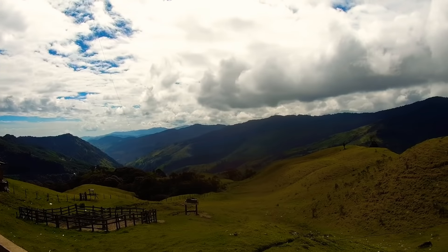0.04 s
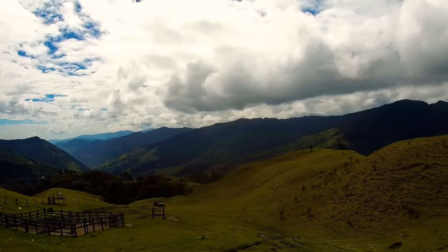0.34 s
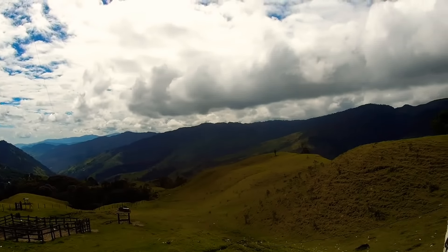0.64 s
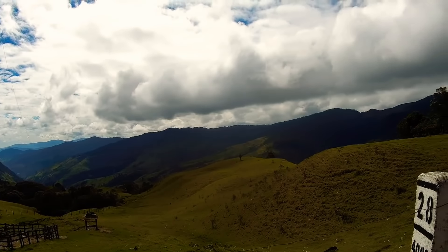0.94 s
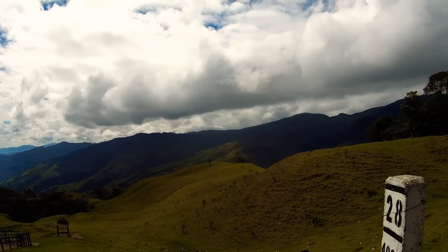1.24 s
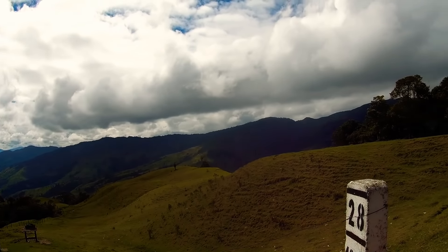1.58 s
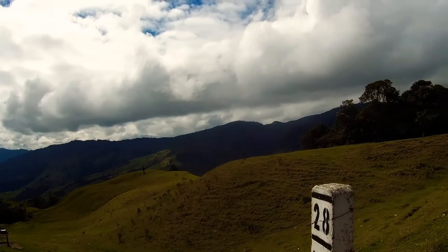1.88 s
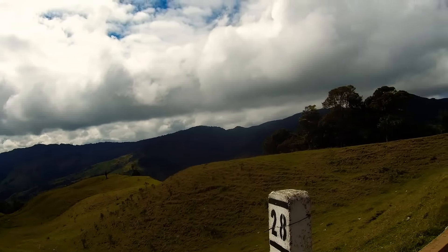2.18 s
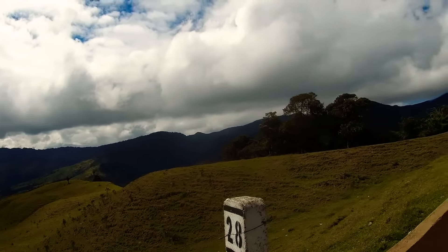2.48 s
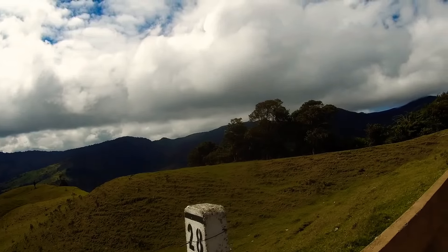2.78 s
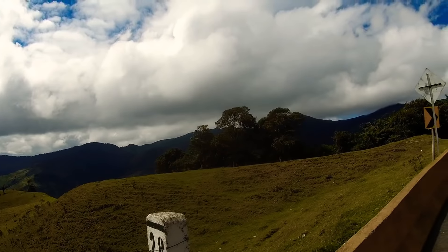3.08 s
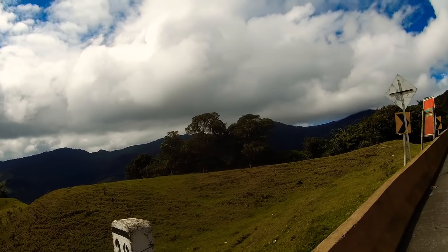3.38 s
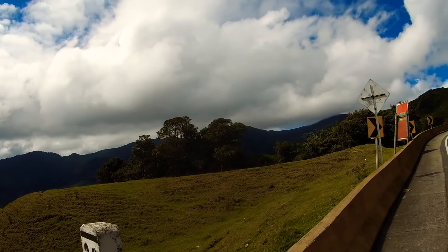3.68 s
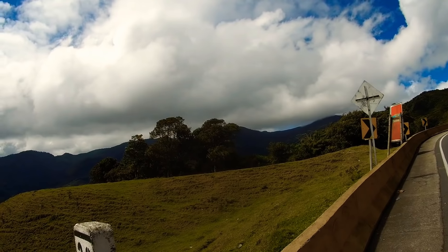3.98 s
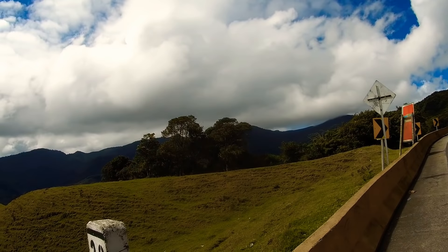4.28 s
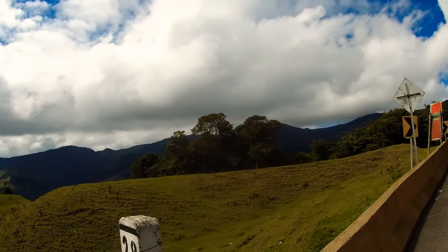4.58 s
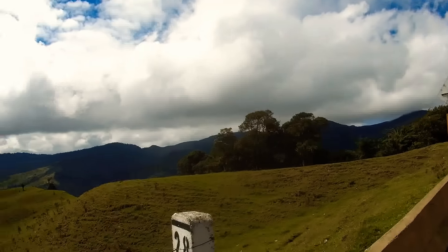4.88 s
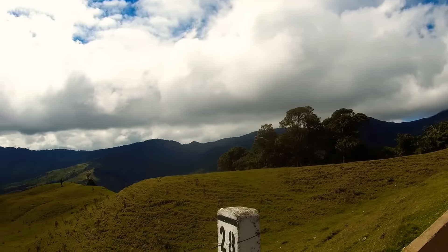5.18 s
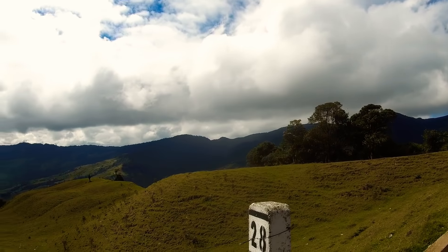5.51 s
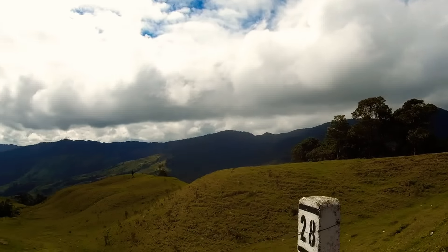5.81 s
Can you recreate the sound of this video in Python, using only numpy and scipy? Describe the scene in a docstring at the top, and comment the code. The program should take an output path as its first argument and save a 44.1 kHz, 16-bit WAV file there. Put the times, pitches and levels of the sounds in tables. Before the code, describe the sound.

A vehicle engine heard from on board climbs slowly in pitch, its roar swelling midway over a steady low road rumble.

```python
"""An engine pulls a vehicle along a mountain highway, heard from on board. Its firings make a note that
climbs slowly, swelling and sinking as it passes the pitches at which the cabin rings. Mid-way the roar
grows with the load and the body groans. Underneath, the drivetrain drones, the tyres rumble and small
bumps knock dully. The rush of air fades in soft gusts, a faint turbo whistle rises and something
ticks once."""
import sys
import numpy as np
from scipy import signal
from scipy.fft import rfft, irfft
from scipy.io import wavfile
from scipy.ndimage import uniform_filter1d

SR = 44100
rng = np.random.default_rng(int(sys.argv[2]) if len(sys.argv) > 2 else 0)


def dump_mix(stems):
    """Bounce the given channels to the path in sys.argv[1] as a 16-bit WAV at rate SR."""
    frames = np.atleast_2d(stems).T  # one column per channel
    limited = np.clip(frames, -1, 1)  # hard clip at full scale
    pcm = np.round(limited * 32767).astype(np.int16)
    wavfile.write(sys.argv[1], SR, pcm)


N = 257837
TIME = np.arange(N) / SR
FREQS = np.fft.rfftfreq(N, 1 / SR)


def gain_of(db):
    """Turns decibels into a number to multiply a sound by."""
    return 10 ** (np.asarray(db) / 20)


def unit_level(sound):
    """Scales a sound so that its average level (rms) is 1."""
    return sound / np.sqrt(np.mean(sound ** 2) + 1e-20)


def curves(rows):
    """Joins a table's points with straight lines: one curve for each column after the time."""
    time_s, *columns = np.transpose(rows)
    return [np.interp(TIME, time_s, column) for column in columns]


def bell(x, centre, width):
    """A smooth hump of height 1, with half the power at width / 2 from its centre."""
    return np.exp(-np.log(2) * 2 * ((x - centre) / width) ** 2)


def tone(level_db, phase):
    """A pure tone whose average level (rms) is level_db."""
    return np.sqrt(2) * gain_of(level_db) * np.cos(phase)


def shaped_noise(gains):
    """Noise of level 1, coloured by one gain for each frequency."""
    return unit_level(irfft(rfft(rng.standard_normal(N)) * gains, N))


def steady_noise(colour):
    """Noise held near level 1. Beyond the ends of its colour table it drops 60 dB per octave."""
    pitch_hz, relative_db = np.transpose(colour)
    octaves, listed = np.log2(FREQS + 1), np.log2(pitch_hz)
    beyond = abs(octaves - np.clip(octaves, listed[0], listed[-1]))
    noise = shaped_noise(gain_of(np.interp(octaves, listed, relative_db) - 60 * beyond))
    return noise / np.sqrt(uniform_filter1d(noise ** 2, size=9001))


def wander(rate_hz):
    """A random wobble of typical size 1; a higher rate makes it quicker."""
    return shaped_noise(bell(FREQS, 0, 2 * rate_hz))


def blend(first, second, start_s, end_s):
    """Fades from one noise into another without a dip in level."""
    share = np.clip((TIME - start_s) / (end_s - start_s), 0, 1)
    return first * np.sqrt(1 - share) + second * np.sqrt(share)


def swells(rows):
    """Bands of noise that each rise and die away."""
    return sum(gain_of(level_db) * bell(TIME, peak_s, length_s) * shaped_noise(bell(FREQS, hz, width_hz))
               for peak_s, length_s, hz, width_hz, level_db in rows)


# Colours of the early rush of air, the late rush and a high fizz: pitch_hz, relative_db
RUSH_EARLY = [(2800, -22), (3700, 0.5), (4100, -0.5), (4500, -3), (5150, -3), (5450, -9), (5800, -13.5),
              (6600, -21.5), (8000, -26.5)]
RUSH_LATE = [(2800, -16.5), (3900, 0), (4400, 3.5), (5700, -2), (6300, -7), (7000, -9), (8200, -14.5),
             (10000, -13.5), (12500, -19)]
FIZZ = [(3000, -8), (6500, 3.5), (8000, 0), (10000, 1.5), (12500, -1)]
# How loud the rush is: time_s, level_db
RUSH_LEVEL = [(0, -74.5), (.9, -72.5), (1.7, -75.5), (2.4, -80), (3.3, -81), (4.6, -85), (5.15, -88),
              (5.85, -88)]
# Short puffs of air: peak_s, length_s, pitch_hz, width_hz, level_db
PUFFS = [(.82, .12, 4500, 1600, -77), (2.75, .35, 3100, 1300, -72.5), (3.38, .3, 5300, 1200, -87),
         (4.45, .25, 5600, 1000, -93), (5.391, .022, 4000, 1100, -80), (5.653, .018, 4200, 1100, -81.5)]
def air():
    """Air rushes past the body in small gusts and puffs, over a faint even fizz."""
    rush_db, = curves(RUSH_LEVEL)
    gust_db = .8 * wander(5.4)
    rush = blend(steady_noise(RUSH_EARLY), steady_noise(RUSH_LATE), start_s=1.7, end_s=3.1)
    return gain_of(rush_db + gust_db) * rush + gain_of(-89) * steady_noise(FIZZ) + swells(PUFFS)


# Colour of the tick: pitch_hz, relative_db
TICK_COLOUR = [(4500, -2), (6400, 4), (7900, -4), (9300, 2), (12500, -2)]
def tick(peak_s=.898, length_s=.000533, level_db=-62.5):
    """One tiny dry tick, a very short burst of bright noise."""
    return gain_of(level_db) * bell(TIME, peak_s, length_s) * steady_noise(TICK_COLOUR)


# Colours of the road's rumble and the body's two booms: pitch_hz, relative_db
RUMBLE = [(10, -18), (22, -10.5), (40, 1), (62, 5), (78, 1), (95, 0), (115, -7.5), (135, -16.5)]
LOW_BOOM = [(100, -4.5), (128, -6.5), (158, 0.5), (180, -4), (205, -7.5), (240, -5), (290, -17.5)]
HIGH_BOOM = [(200, -10.5), (260, -4.5), (300, 1.5), (340, 2.5), (390, -1.5), (440, -6), (500, -11),
             (620, -22.5), (900, -47.5)]
def road(firing_hz, load_db, surge_db):
    """Tyres shake the body: a rumble and two hollow booms. The top one grows with load and speed."""
    uneven_db, bumps_per_s = .5, 2.2  # the road surface keeps the two low layers slightly uneven
    rumble_db = -40.5 + uneven_db * wander(bumps_per_s)
    low_db = -41.5 + .08 * load_db + uneven_db * wander(bumps_per_s)
    octaves_climbed = np.log2(firing_hz / firing_hz[0])
    high_db = -45.5 + .71 * load_db + 7 * octaves_climbed + .5 * surge_db
    booms = gain_of(low_db) * steady_noise(LOW_BOOM) + gain_of(high_db) * steady_noise(HIGH_BOOM)
    return gain_of(rumble_db) * steady_noise(RUMBLE) + booms


# Dull knocks from the suspension: peak_s, length_s, pitch_hz, level_db
KNOCKS = [(.025, .016, 130, -35), (.69, .018, 85, -37), (.832, .012, 140, -33), (1.16, .018, 75, -38),
          (1.248, .022, 65, -35), (5.18, .03, 45, -37), (5.3, .04, 36, -36)]
def knocks():
    """Each bump in the road pushes the body to and fro once or twice."""
    return sum(bell(TIME, peak_s, length_s) * tone(level_db, 2 * np.pi * pitch_hz * (TIME - peak_s))
               for peak_s, length_s, pitch_hz, level_db in KNOCKS)


# Swells of hollow noise: peak_s, length_s, pitch_hz, width_hz, level_db
HOLLOW_SWELLS = [(.6, 1.3, 119.2, 29.2, -44.5), (.72, 0.25, 308.4, 39.8, -45), (.77, .13, 680, 260, -50),
                 (1.6, 0.63, 385, 59.8, -50), (2.0, 0.88, 263.7, 44.9, -43),
                 (2.45, 0.77, 150.5, 25.16, -45.5), (2.56, 0.3, 672, 90, -48.5), (2.6, .5, 847, 160, -53.5),
                 (3.22, 0.31, 515, 59.11, -47.5), (3.4, 0.55, 273, 49.6, -44.5), (3.5, 1, 209.6, 34.8, -44),
                 (3.3, .3, 240, 40, -43), (3.6, 1.4, 1020, 90, -59), (3.95, .45, 162, 25, -47),
                 (3.7, 0.83, 550, 35.7, -47), (4.48, 0.5, 397.4, 29.5, -43),
                 (5.2, 0.98, 173.3, 29.8, -46.5), (5.3, 0.95, 423.5, 80.4, -45.5)]
def hollow_swells():
    """Hollow noise comes and goes: body booms, surges of the roar and a fuzzy band around the whine."""
    return swells(HOLLOW_SWELLS)


# Short groans of the body under load: peak_s, length_s, pitch_hz, level_db
GROANS = [(3.09, .06, 333, -43), (3.33, .04, 343, -39), (3.5, .08, 340, -41), (3.87, .03, 351, -36.5),
          (4.0, .06, 354, -34), (4.0, .05, 570, -42), (4.2, .03, 350, -38), (4.34, .06, 574, -40),
          (4.44, .035, 345, -37.5)]
def groans(sag_hz_per_s=200, jitter_rad=.35):
    """In each groan a panel rings for a moment while its pitch sinks a little."""
    sound = np.zeros(N)
    for peak_s, length_s, pitch_hz, level_db in GROANS:
        t = TIME - peak_s
        cycles = pitch_hz * t - sag_hz_per_s * t ** 2 / 2 + rng.random()
        sound += bell(t, 0, length_s) * tone(level_db, 2 * np.pi * cycles + jitter_rad * wander(45))
    return sound


def resonance_db(pitch_hz, centre_hz, width_hz):
    """A resonance favours one pitch: 0 dB at its centre, ever quieter to either side."""
    return -20 * np.log10(1 + (2 * (pitch_hz - centre_hz) / width_hz) ** 2)


# How loud the drivetrain's drone is: time_s, level_db
DRONE_LEVEL = [(0, -41), (.12, -35), (.27, -31.7), (.45, -35), (.58, -42), (.85, -46), (1.25, -40.5),
               (1.6, -52), (2.4, -49), (2.62, -41), (2.9, -46), (3.9, -46), (4.9, -52), (5.15, -43),
               (5.5, -48), (5.85, -46)]
def drivetrain(firing_hz, firing_phase, drone_ratio=.412):
    """A low drone geared to the engine, and an unsteady whine that sings as it crosses a resonance."""
    drone_db, = curves(DRONE_LEVEL)
    drone = tone(drone_db, drone_ratio * firing_phase + .15 * wander(6))
    whine_ratio = 2 + drone_ratio
    whine_db = -49.5 + resonance_db(whine_ratio * firing_hz, centre_hz=571, width_hz=22)
    whine = tone(whine_db + 2 * wander(5.5), whine_ratio * firing_phase + .8 * wander(14))
    return drone + whine


# The turbo's whistle: time_s, pitch_hz, level_db
WHISTLE = [(0, 7680, -107), (.3, 7950, -114), (1.4, 9060, -108), (1.55, 9230, -106), (1.75, 9560, -112),
           (1.83, 9680, -99.5), (2.2, 10380, -99), (2.35, 10800, -116), (2.66, 11650, -108),
           (2.88, 11990, -112), (3.02, 12130, -102), (3.25, 12290, -100), (3.44, 12420, -99),
           (3.52, 12380, -111), (3.62, 12330, -105), (3.9, 12250, -118)]
def turbo():
    """A thin, wavering whistle that climbs as the turbine spins up."""
    pitch_hz, level_db = curves(WHISTLE)
    phase = 2 * np.pi * np.cumsum(pitch_hz + 18 * wander(60)) / SR
    return tone(level_db + 3 * wander(9), phase)


# Colours of the engine's roar and rasp at each stage of the pull: pitch_hz, relative_db
ROAR_EARLY = [(260, -18), (450, -8), (546, -4.5), (605, -1.5), (658, -7), (694, -3), (751, -8.5),
              (889, -6.5), (1460, -15), (1590, -19.5), (1900, -24), (2470, -42), (4180, -120)]
ROAR_PULLING = [(280, -22.5), (480, -2.5), (690, -1.5), (904, -9), (1090, -10), (1530, -21.5), (1720, -26),
                (1900, -34.5), (2470, -59.5), (4180, -120)]
ROAR_LATE = [(310, -34.5), (530, -12.5), (674, -0.5), (746, -9), (774, -5), (871, -13), (945, -9.5),
             (985, -5.5), (1020, -14), (1040, -15), (1230, -13.5), (1460, -21), (1610, -26.5), (1900, -31),
             (2470, -53), (4180, -120)]
RASP_EARLY = [(1350, -20), (1720, -0.5), (2080, -4), (2420, -3), (2750, -5.5), (3100, -11), (3450, -14.5),
              (3800, -22.5), (4600, -42.5)]
RASP_PULLING = [(1300, -22.5), (1680, 6), (2050, -3), (2250, -2), (2550, -0.5), (2850, -2.5), (3050, -6),
                (3450, -7.5), (3850, -17.5), (5000, -39.5)]
# How loud the mechanical rasp is: time_s, level_db
RASP_LEVEL = [(0, -62), (.8, -62), (1.8, -64), (2.7, -63.5), (3.5, -63.5), (3.9, -65), (4.3, -67),
              (4.6, -66.5), (5.15, -69.5), (5.45, -68), (5.85, -67.5)]
def engine_roar(firing_phase, roar_db):
    """Burning fuel and indrawn air roar while moving parts rasp, all pulsing with the firings."""
    roar = blend(steady_noise(ROAR_EARLY), steady_noise(ROAR_PULLING), start_s=1.32, end_s=2.37)
    roar = blend(roar, steady_noise(ROAR_LATE), start_s=3.6, end_s=4.8)
    # The rasp hardens under load, then eases part of the way back.
    rasp = blend(steady_noise(RASP_EARLY), steady_noise(RASP_PULLING), start_s=.97, end_s=2.28)
    rasp = blend(rasp, steady_noise(RASP_EARLY), start_s=4.5, end_s=8.6)
    rasp_db, = curves(RASP_LEVEL)
    pulsing = 1 + .071 * np.cos(firing_phase)
    return pulsing * (gain_of(roar_db + .55 * wander(8)) * roar + gain_of(rasp_db) * rasp)


def uneven_cylinders(firing_phase, roar_db):
    """The cylinders are not quite equal, which adds weak tones between the engine's main ones."""
    ratios = [sixths / 6 for sixths in range(8, 36) if sixths % 6]
    tones = np.zeros(N)
    for ratio in ratios:
        strength = gain_of(-3.8 * ratio) * (1 + .84 * wander(1.9))
        tones += strength * np.cos(ratio * firing_phase + 2 * np.pi * rng.random())
    return gain_of(roar_db - 6) * unit_level(tones)


# Pitches that the cabin boosts or swallows: pitch_hz, width_hz, change_db
CABIN_RESONANCES = [(177, 14, 2), (191, 5, 1.5), (202, 18, 4), (224.5, 2.6, -11), (233.3, 6.2, 5.6)]
# Brief dips in the firing tone: centre_s, length_s, change_db
NOTE_DIPS = [(.21, .04, -9), (.48, .05, -7), (.94, .05, -6), (1.79, .1, -12), (1.95, .1, -24),
             (2.63, .08, -7), (3.34, .03, -12), (3.64, .04, -7), (4.04, .06, -12), (4.19, .035, -6),
             (4.7, .3, -2.5)]
# How loud the tone an octave above the firing tone is: time_s, level_db
OCTAVE_LEVEL = [(0, -60), (1.85, -57), (2.1, -49), (2.22, -44), (2.31, -46), (2.4, -42), (2.6, -41.2),
                (2.76, -43), (2.94, -41.5), (3.12, -45), (3.25, -53), (4.35, -56), (4.62, -45), (4.95, -48),
                (5.22, -47.5), (5.38, -53), (5.85, -55)]
def engine_note(firing_hz, firing_phase, load_db, surge_db, jitter_rad=.16):
    """The firings blur into one tone, with higher tones at two and four times its pitch."""
    cabin_db = sum(db * bell(firing_hz, hz, width_hz) for hz, width_hz, db in CABIN_RESONANCES)
    dip_db = sum(db * bell(TIME, centre_s, length_s) for centre_s, length_s, db in NOTE_DIPS)
    firing_db = -41.3 + cabin_db + dip_db + surge_db
    octave_db, = curves(OCTAVE_LEVEL)
    fourth_db = -60 + resonance_db(4 * firing_hz, centre_hz=975, width_hz=70)
    phase = firing_phase + jitter_rad * wander(11)
    flutter_db = 1.1 + .12 * load_db  # the tones shake more as the engine works harder
    note = tone(firing_db + flutter_db * wander(18), phase)
    note += tone(octave_db + flutter_db * wander(9.2), 2 * phase)
    return note + tone(fourth_db + flutter_db * wander(20), 4 * phase)


# Engine speed, as firings per second: time_s, firing_hz
ENGINE_SPEED = [(0, 168.1), (.15, 165.1), (.33, 162.9), (.6, 177.9), (.8, 178.4), (1.1, 175.1),
                (1.55, 192.2), (1.95, 195.2), (2.4, 210.3), (3.0, 224.9), (3.42, 232.6), (3.88, 236.5),
                (4.05, 237.5), (4.5, 238.2), (4.85, 240.7), (5.3, 247.6), (5.55, 252.7), (5.85, 257.6)]
# How hard the engine works, as the level of its roar: time_s, level_db
ROAR_LEVEL = [(0, -48.5), (.8, -48), (1.55, -48), (2.0, -45.5), (2.6, -41.5), (3.3, -41.5), (3.95, -44.5),
              (4.5, -45.5), (5.85, -48.5)]
def scene():
    """Engine speed and load steer the main layers; one microphone on board hears everything."""
    firing_hz, = curves(ENGINE_SPEED)
    firing_phase = 2 * np.pi * np.cumsum(firing_hz) / SR
    roar_db, = curves(ROAR_LEVEL)
    light_load_db = -48.5
    load_db = roar_db - light_load_db
    surge_db = .9 * wander(3.1)  # the firing tone and the high boom swell together
    background = air() + tick() + road(firing_hz, load_db, surge_db)
    background += knocks() + hollow_swells() + groans()
    machinery = drivetrain(firing_hz, firing_phase) + turbo()
    engine = engine_roar(firing_phase, roar_db) + uneven_cylinders(firing_phase, roar_db)
    engine += engine_note(firing_hz, firing_phase, load_db, surge_db)
    return (background + machinery + engine)[None]


def record(dry, cutoff_hz=12750):
    """Softens the very start and end of the sound and removes the highest treble."""
    soft_ends = signal.windows.tukey(N, .0012)
    low_pass = signal.firwin(511, cutoff_hz, window=("kaiser", 9), fs=SR)
    return signal.oaconvolve(dry * soft_ends, low_pass[None], "same")


dry = scene()
out = record(dry)
dump_mix(out)
```